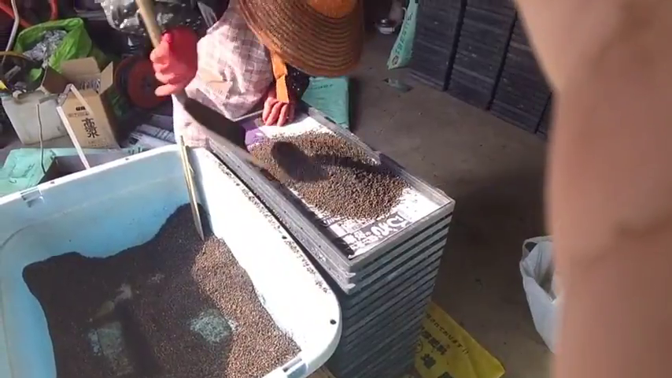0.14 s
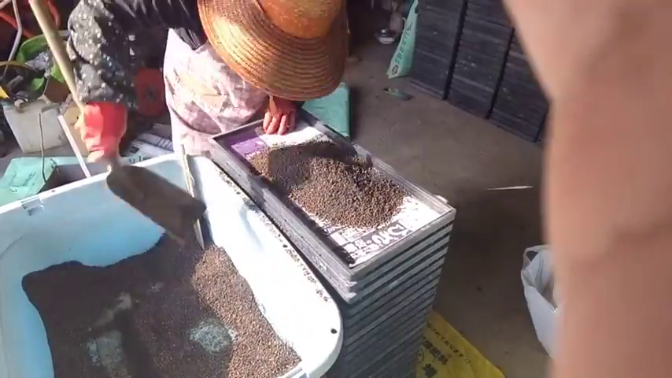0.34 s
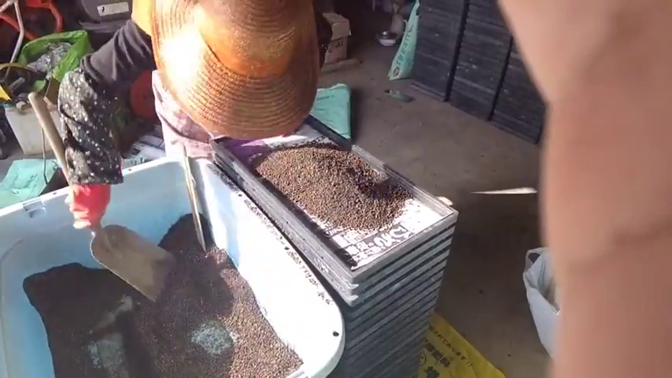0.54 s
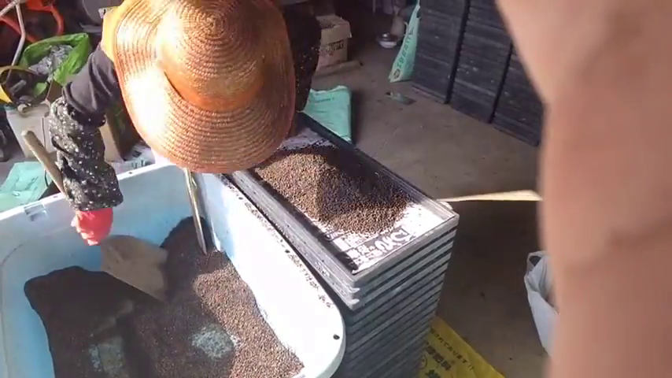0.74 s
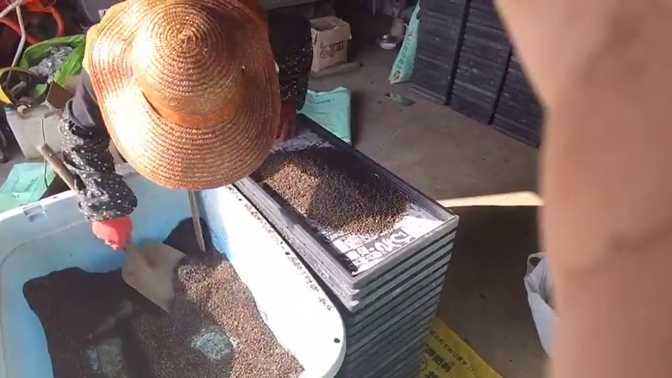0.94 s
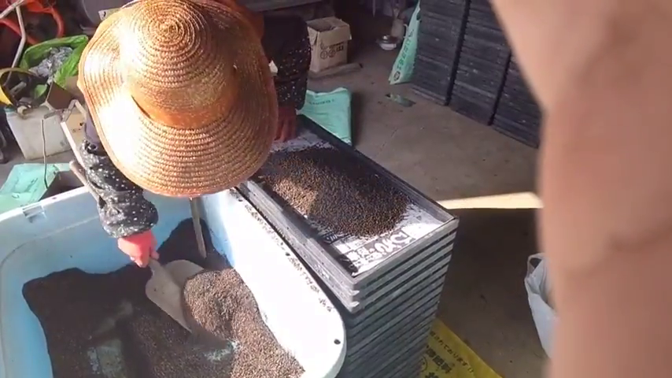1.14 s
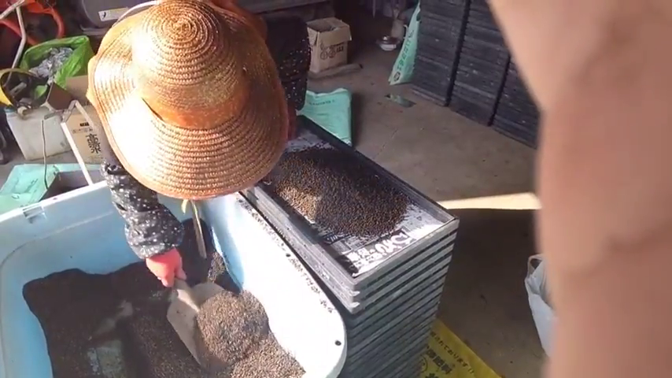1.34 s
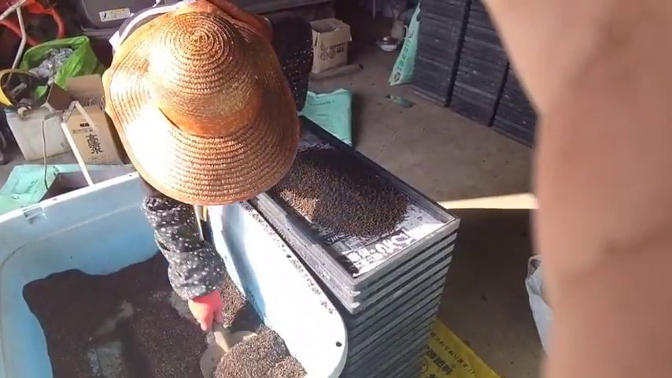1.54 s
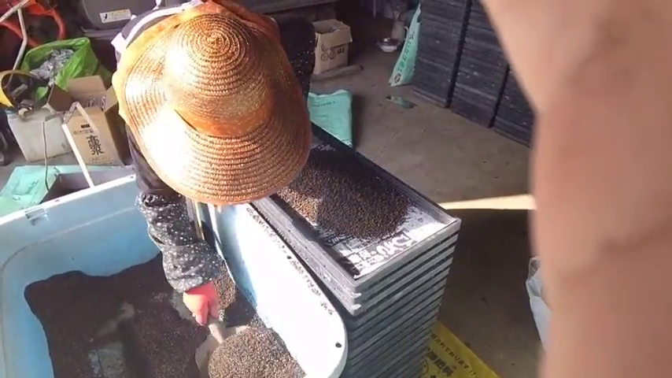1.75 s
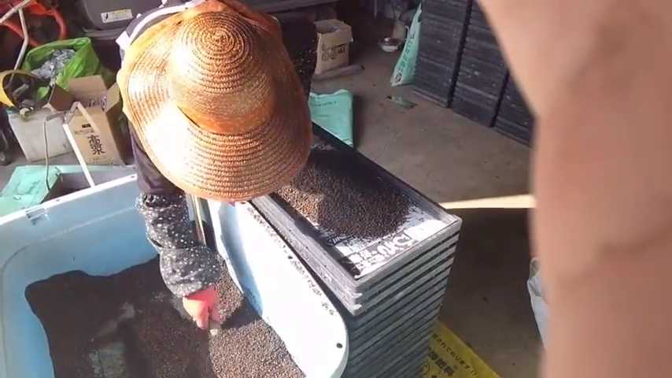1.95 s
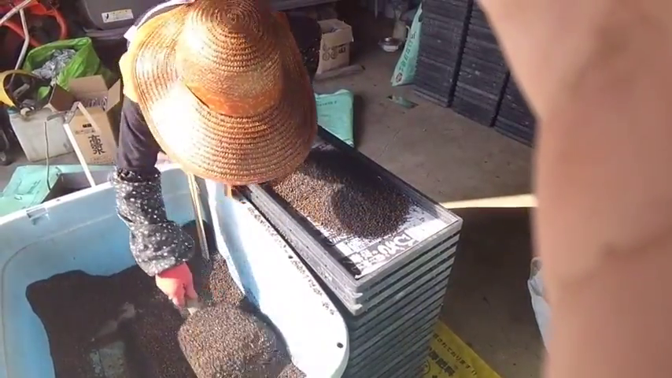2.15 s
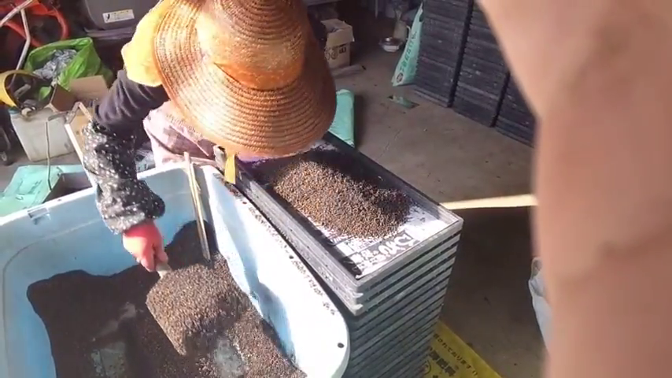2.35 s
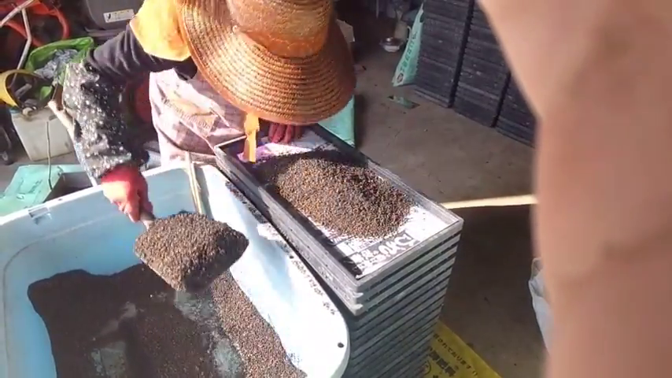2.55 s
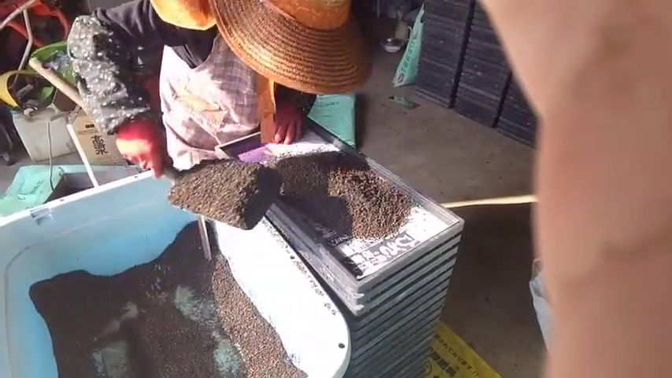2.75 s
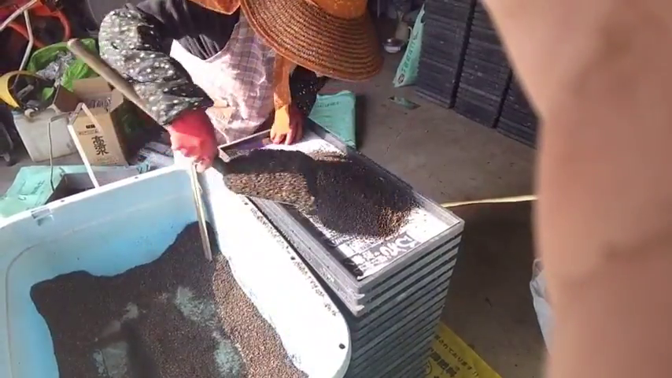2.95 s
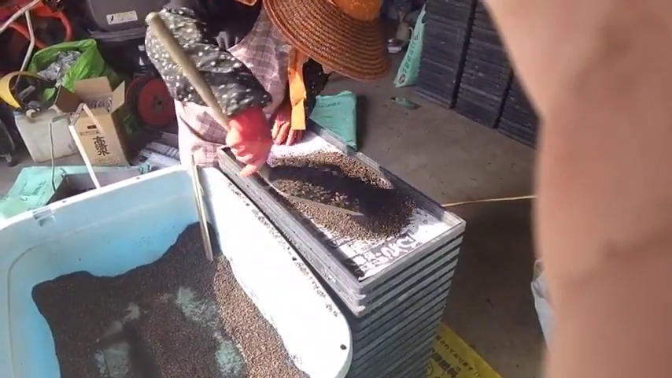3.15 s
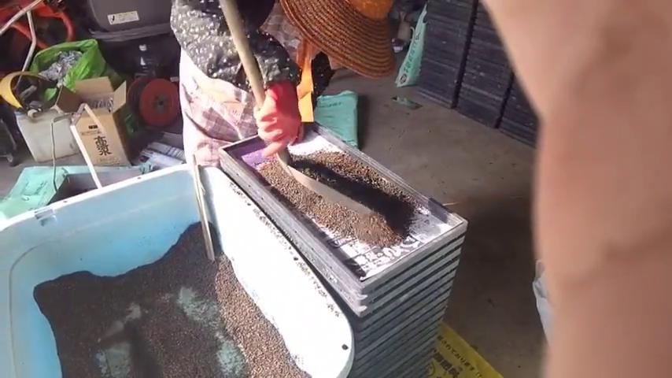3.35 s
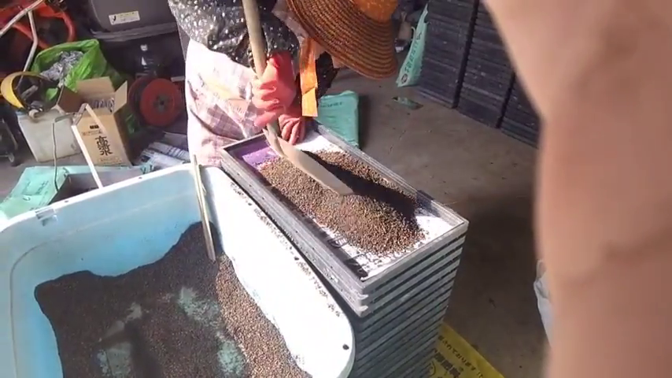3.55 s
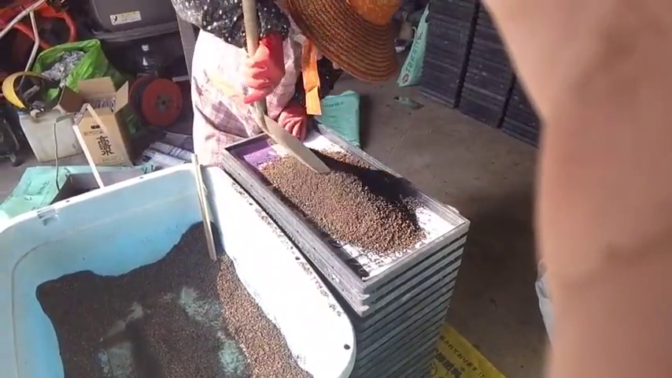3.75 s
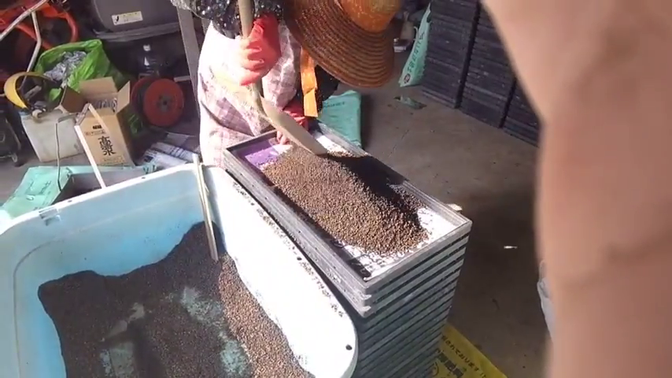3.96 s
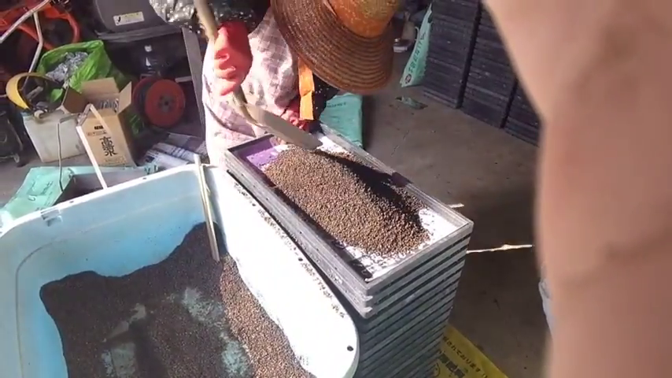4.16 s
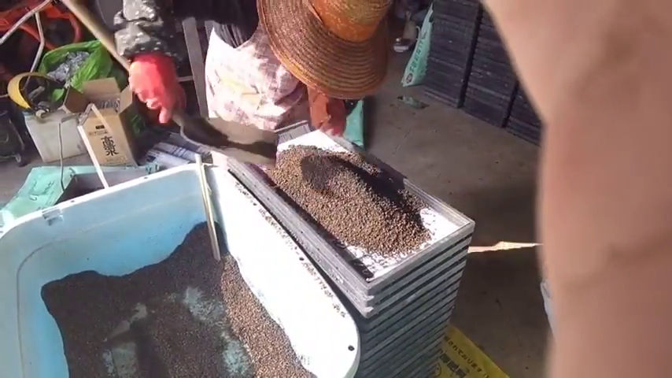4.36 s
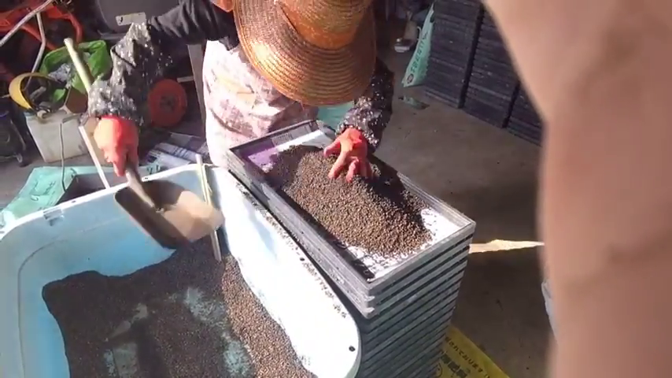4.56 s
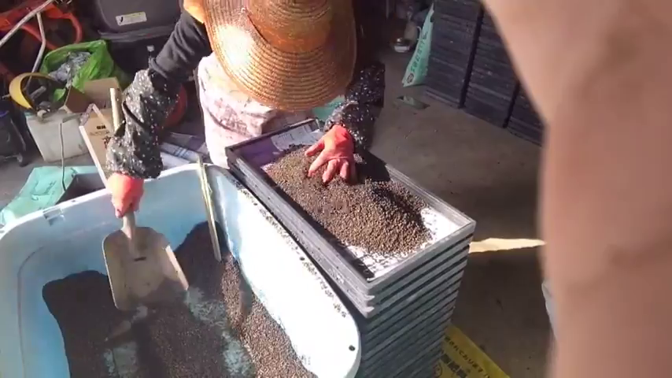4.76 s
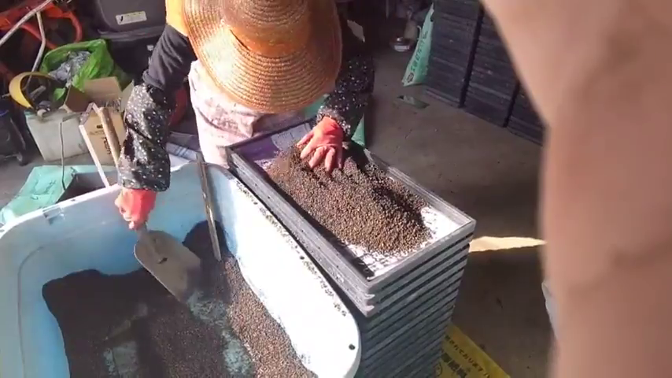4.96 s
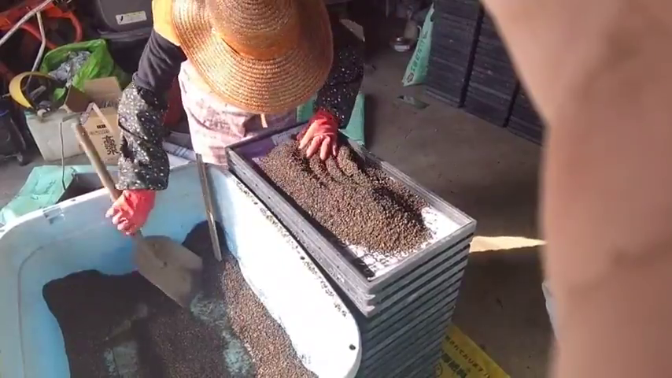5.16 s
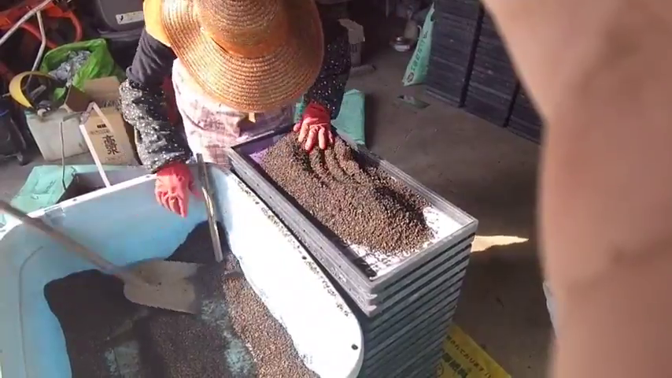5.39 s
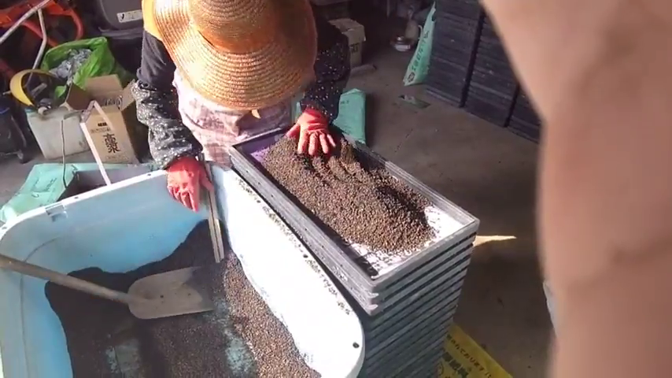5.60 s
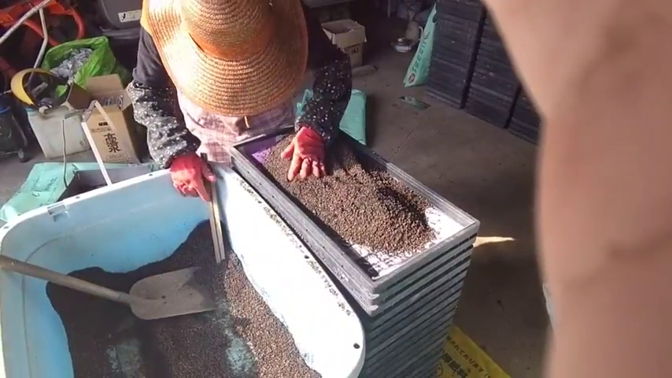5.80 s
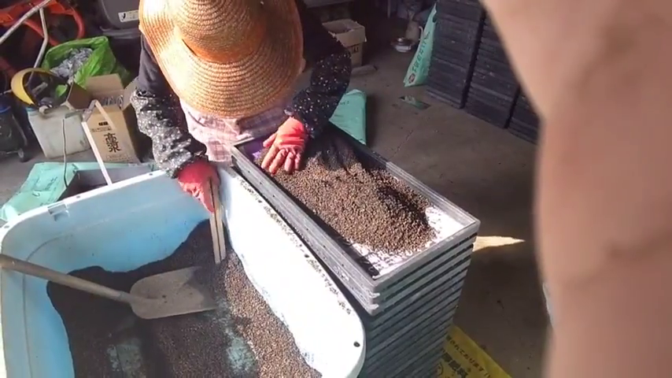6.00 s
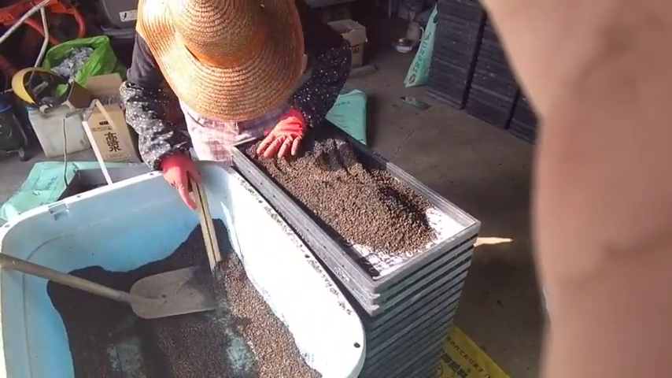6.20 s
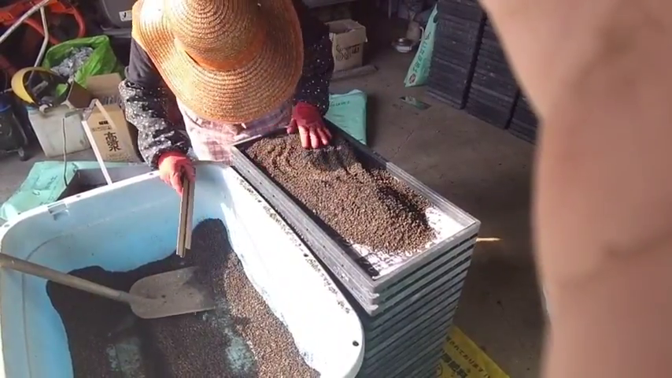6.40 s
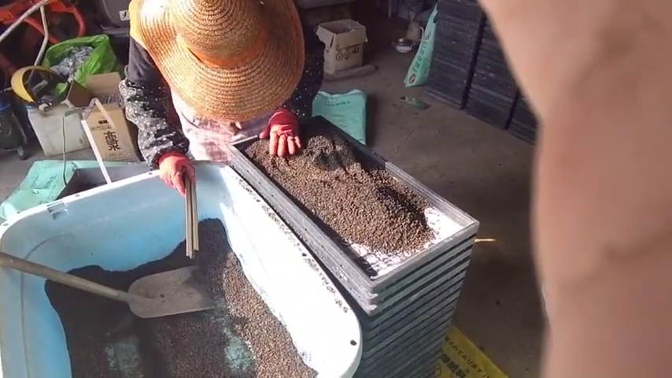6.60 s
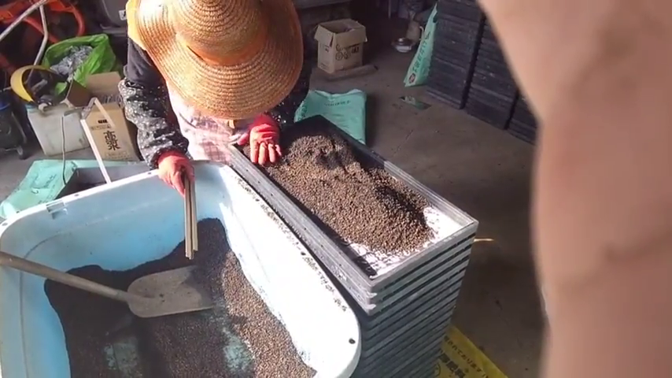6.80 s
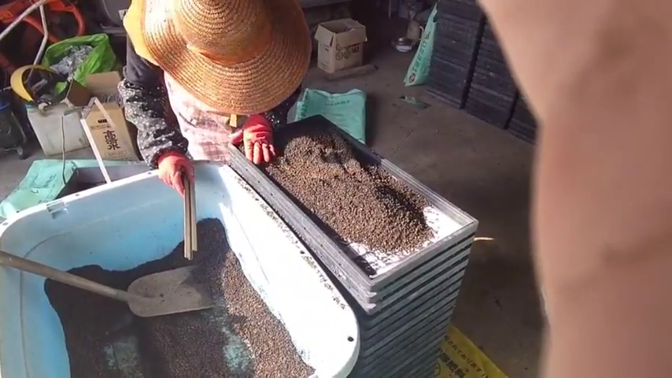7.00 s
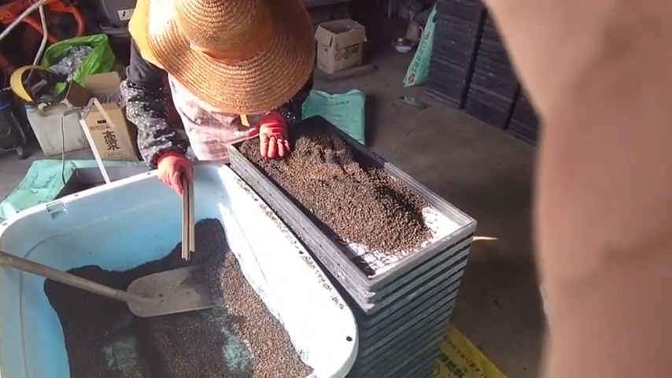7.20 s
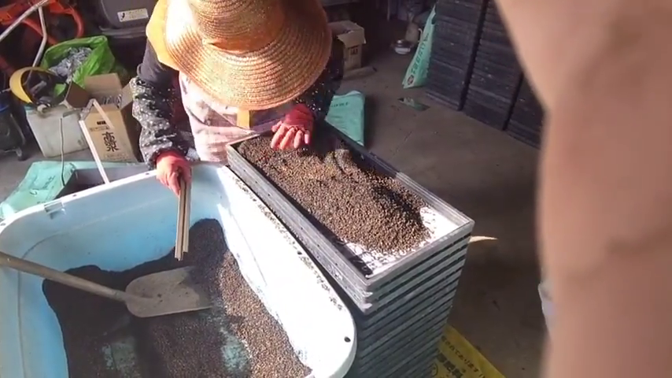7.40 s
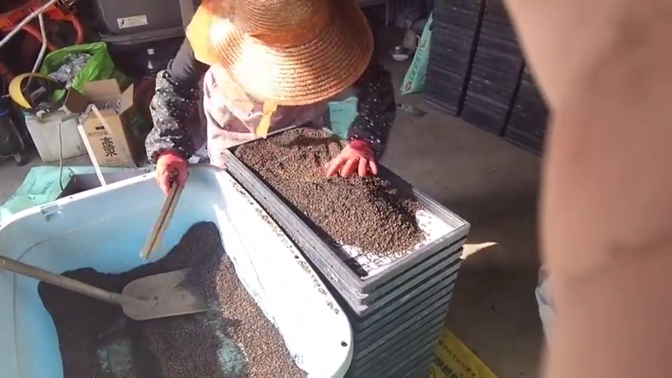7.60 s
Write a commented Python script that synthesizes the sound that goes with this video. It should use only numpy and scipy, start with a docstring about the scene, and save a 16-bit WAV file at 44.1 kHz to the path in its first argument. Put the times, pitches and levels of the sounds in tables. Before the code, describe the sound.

A shovel crunches and rasps through pelleted soil along a hollow plastic tub, soil slides out, the shovel clatters down, a glove rustles.

```python
"""Shovelling pelleted soil

A shovel crunches into pelleted soil, then rasps and bumps along a booming plastic tub floor.
Soil is tipped on a tray; the shovel drops into the tub with a clatter, then a glove spreads the soil.
Random contacts are filtered into crunch, rasp, fizz and rustle; tub and blade are sums of decaying modes.
Short noise bursts make clacks and ticks; a faint hush and a diffuse shed tail surround them, in stereo."""
import sys
import numpy as np
from scipy import signal
from scipy.fft import rfft, irfft, next_fast_len
from scipy.io import wavfile
from scipy.ndimage import uniform_filter1d

SR = 44100
rng = np.random.default_rng(int(sys.argv[2]) if len(sys.argv) > 2 else 0)


def output_pcm(signal):
    """Save a mono or channel-first signal as 16-bit PCM at the path in sys.argv[1].

    Samples are clipped to [-1, 1] before scaling.
    """
    pcm = np.clip(np.atleast_2d(signal).T, -1, 1) * 32767
    wavfile.write(sys.argv[1], SR, np.round(pcm).astype(np.int16))


N = 336924
TIME_S = np.arange(N) / SR
BINS_HZ = np.fft.rfftfreq(4096, 1 / SR)

# tub modes: (frequency [Hz], relative level [dB], t60 [s])
TUB_MODES = [(65.3, -29, 0.11), (115.6, -17.5, 0.2), (166.8, -5.5, 0.12), (186.8, -1, 0.11),
             (228.7, 0, 0.086), (282.2, 5.5, 0.12), (282.4, 7, 0.12), (346.3, -1.5, 0.074),
             (417, -10, 0.072), (489, -18, 0.18)]
# shovel blade modes: (frequency [Hz], relative level [dB], t60 [s])
BLADE_MODES = [(573, 12.5, 0.12), (686, -9.5, 0.075), (818, -4.5, 0.17), (855, 9.5, 0.14),
               (960, -11.5, 0.55), (1060, -9.5, 0.56), (1132, -12.5, 0.14), (1290, 14, 0.097),
               (1700, -15, 0.18), (1780, -19.5, 0.06), (2170, -10, 0.053), (2227, 3, 0.12),
               (2720, -4, 0.17)]
# body of a blow on plastic: (frequency [Hz], relative level [dB per Hz])
CLACK_SPECTRUM = [(40, -28.5), (150, -16.5), (350, -15), (470, -10), (620, -6), (800, -0.5), (1100, -8.5),
                  (1500, -10), (2250, -11.5), (2800, -21), (3600, -32), (7000, -53)]
# bright edge of a hard contact: (frequency [Hz], relative level [dB per Hz])
EDGE_SPECTRUM = [(1500, -32), (2800, -4), (4500, 5), (6500, 1), (10000, -7.5), (11000, -8), (14500, -8.5)]


def amp(db):
    """Decibels to gain."""
    return 10 ** (np.asarray(db) / 20)


def unit(x):
    """Scales to an rms of one."""
    return x / np.sqrt(np.mean(x ** 2) + 1e-20)


def read(points, hz):
    """Interpolates a table's value on a log-frequency axis."""
    f, value = np.transpose(points)
    return np.interp(np.log(hz + 1), np.log(f + 1), value)


def add(mix, start_s, sound):
    """Mixes a stereo sound in at its start time."""
    part = mix[:, max(round(start_s * SR), 0):][:, :sound.shape[1]]
    part += sound[:, :part.shape[1]]


def convolve(x, response):
    """Filters along time and keeps the length."""
    return signal.oaconvolve(np.atleast_2d(x), np.atleast_2d(response), axes=1)[:, :x.shape[-1]]


def panned(x, lean_db):
    """Leans a sound to the left (positive) or right by a level difference."""
    return x * amp(np.array([[lean_db], [-lean_db]]) / 2)


def together(gains):
    """Overlapping movements add in power."""
    return np.sqrt(sum(g ** 2 for g in gains))


def colour(spectrum):
    """Minimum-phase impulse response with this spectrum."""
    log_gain = np.log(amp(np.maximum(read(spectrum, BINS_HZ), -90)))
    circle = np.concatenate([log_gain, log_gain[-2:0:-1]])
    response = np.fft.ifft(np.exp(np.conj(signal.hilbert(circle)))).real
    return response[:len(BINS_HZ)]


def ring(modes, size=16000):
    """An object's answer to one push, peak one: decaying sines of alternating sign."""
    t = np.arange(size) / SR
    x = np.zeros(size)
    for k, (hz, db, t60_s) in enumerate(modes):
        decay = amp(db - 60 * t / t60_s)
        x += (-1) ** k * decay * np.sin(2 * np.pi * hz * t)
    return x / abs(x).max()


def burst(t60_s, size=6000):
    """A contact and its scatter off nearby surfaces: dying noise of unit energy on each side."""
    decay = amp(-60 * np.arange(size) / SR / max(t60_s, 1e-3))
    x = rng.standard_normal((2, size)) * decay
    return x / np.linalg.norm(x, axis=1, keepdims=True)


def blow(response, t60_s, size=440):
    """A short contact through a response, rms one over its loudest hundredth of a second."""
    x = signal.fftconvolve(burst(t60_s), response[None], axes=1)
    return x / np.sqrt(uniform_filter1d((x ** 2).mean(0), size).max())


def collisions(per_s, spread_db, clump_db, clump_hz, t60_s, count=10, order=3):
    """Random contacts of uneven size in small avalanches, each from a few neighbouring places."""
    avalanche = (TIME_S * clump_hz + .4 * np.sin(TIME_S * clump_hz)).astype(int)
    clumps = uniform_filter1d(np.clip(rng.standard_normal(N), -2, 2)[avalanche], 80)
    size_db = spread_db * np.minimum(rng.exponential(1, N), 4) + clump_db * clumps
    struck = rng.random(N) < per_s / SR
    hits = amp(size_db) * rng.choice([-1, 1], N) * struck
    first_place = rng.integers(0, count, N)[avalanche // order]
    place = (first_place + rng.integers(0, order, N)) % count
    # each place has its own stereo burst
    return sum(convolve(hits * (place == k), burst(t60_s, size=1000)) for k in range(count))


def air():
    """The steady hush of the shed: coloured noise, independent on the two sides."""
    # (frequency [Hz], relative level [dB per Hz])
    hush_spectrum = [(25, 0.5), (80, -10.5), (200, -1.5), (440, -1.5), (830, -5.5), (1300, -9.5),
                     (2100, -8), (3100, -12), (5500, -9.5), (9500, -17), (14000, -19.5)]
    return amp(-61) * unit(convolve(rng.standard_normal((2, N)), colour(hush_spectrum)))


def shed(x, gap_s=0.005):
    """A diffuse tail: noise that dies at a different rate in each band."""
    # (frequency [Hz], t60 [s])
    decay_times = [(100, 0.15), (400, 0.36), (1500, 0.21), (5000, 0.29), (14000, 0.17)]
    hz, t, z = signal.stft(rng.standard_normal((2, SR // 2)), SR, nperseg=256)
    tail = signal.istft(z * amp(-60 * t / read(decay_times, hz)[:, None]), SR)[1]
    # silent for one gap, then fades in over another
    tail *= np.clip(np.arange(tail.shape[1]) / SR / gap_s - 1, 0, 1)
    return convolve(x, tail / np.linalg.norm(tail[0]))


def strays():
    """Loose pellets drop at random moments: rows of (time [s], tick [dB], knock [dB])."""
    # showers: (start [s], end [s], rate [pellets/s], typical relative tick level [dB])
    showers = [(2.329, 3.02, 20, -40.5), (5.704, 7.5, 6, -49.5)]
    rows = []
    for start_s, end_s, per_s, typical_db in showers:
        chance = rng.random((60, 2))
        times_s = start_s + np.cumsum(2 * chance[:, 0]) / per_s
        levels_db = typical_db + 5 * (2 * chance[:, 1] - 1)  # within 5 dB either way
        rows += [(s, db, db - 23) for s, db in zip(times_s, levels_db) if s < end_s]
    return rows


def ticks():
    """Little strikes of pellets and blade edge, each with a short knock of plastic under it."""
    # single strikes of pellets and blade edge, hard and faint:
    # (time [s], relative tick level [dB], relative knock level [dB])
    strikes = [(0.7143, -28, -69), (0.9717, -25.5, -28), (1.0994, -17, -22.5), (1.5224, -6, -20),
               (1.933, -25, -52), (2.5082, -31, -40), (2.5406, -27.5, -40), (2.6115, -29.5, -43),
               (2.6419, -29.5, -37.5), (2.6813, -29.5, -39), (2.7252, -29.5, -35), (2.8594, -30, -54),
               (2.8735, -35, -59), (3.268, -41, -64), (3.3213, -38, -54), (3.5967, -31, -31.5),
               (4.7516, -36, -36), (5.0045, -24, -31), (5.9074, -48, -35), (5.9269, -24.5, -57),
               (6.3919, -37.5, -57), (6.4028, -33.5, -54), (6.5538, -43.5, -48), (6.9666, -31, -50)]
    out, clack, edge = np.zeros((2, N)), colour(CLACK_SPECTRUM), colour(EDGE_SPECTRUM)
    for s, tick_db, knock_db in strikes + strays():
        add(out, s, amp(tick_db - 10.5) * blow(edge, t60_s=0.016))
        add(out, s, amp(knock_db - 8) * blow(clack, t60_s=0.02))
    return out


def speed(start_s, rise_s, hold_s, fall_s):
    """Speed of moving soil, 0 to 1: it gathers pace, runs and slows to a stop."""
    t = TIME_S - start_s
    return np.clip(np.minimum(t / rise_s, 1 - (t - rise_s - hold_s) / fall_s), 0, 1)


def sliding_soil():
    """Pellets fizz on the blade or under the glove, while soil rustles on the tray or in the tub beneath."""
    # soil sliding off or under the blade: (start [s], rise [s], hold [s], fall [s],
    # relative fizz level [dB], relative rustle level [dB], lean of the fizz to the left [dB])
    slides = [(-0.07, 0.19, 0.027, .58, -45, -48, 0.5), (2.003, 0.31, 0.025, 0.11, -59, -53, -3),
              (2.282, 0.22, .24, .36, -51, -49, 0), (3.275, 0.21, 0.025, 0.29, -34, -43.5, -3),
              (3.143, .6, .5, .22, -48.5, -50.5, -1), (3.884, 0.056, 0.044, 0.24, -45, -45.5, -2),
              (4.27, 0.4, 0.19, 0.098, -57.5, -56, 3), (4.798, 0.34, .1, 0.23, -40, -49.5, -3)]
    # glove over the tray: (start [s], rise [s], hold [s], fall [s],
    # relative fizz level [dB], relative rustle level [dB])
    sweeps = [(5.625, 0.18, 0.14, .1, -54.5, -50.5), (5.902, 0.1, .22, 0.18, -38.5, -47.5),
              (6.36, 0.038, 0.028, 0.12, -59.5, -55), (6.495, 0.093, 0.48, 0.66, -58.5, -55),
              (6.665, .07, 0.058, 0.27, -50, -76), (7.507, 0.11, 0.073, .1, -73, -63.5)]
    # spectra of blade fizz, glove fizz and rustle: (frequency [Hz], relative level [dB per Hz])
    fizz_spectrum = [(1500, -35), (2500, -8), (3200, -11.5), (4300, -2.5), (5200, -2), (6700, -1),
                     (8700, -5), (9800, -4.5), (10900, -12.5), (12000, -11), (13800, -10.5), (14800, -37)]
    rub_spectrum = [(1500, -48.5), (2500, -13), (3200, -7.5), (4400, -1), (5300, 0.5), (7000, -2),
                    (9800, -3), (10900, -8.5), (12200, -4), (14000, -10), (14800, -17)]
    rustle_spectrum = [(60, -73.5), (140, -16.5), (230, -5), (300, -1), (450, -2), (700, -2.5), (1000, -3),
                       (1400, -4.5), (2100, 0), (2850, -9.5), (4300, -27.5)]
    fizz_power, rustle_power = 1.48, 0.98  # gain grows as these powers of speed

    pellets = collisions(per_s=5900, spread_db=1.0, clump_db=1.0, clump_hz=110.5, t60_s=0.0073, count=16)
    fizz = unit(convolve(pellets, colour(fizz_spectrum)))
    rub = unit(convolve(pellets, colour(rub_spectrum)))
    grains = collisions(per_s=3000, spread_db=3.5, clump_db=0.86, clump_hz=69.64, t60_s=0.021)
    rustle = unit(convolve(grains, colour(rustle_spectrum)))

    blade = together(panned(amp(db) * speed(*timing) ** fizz_power, lean_db)
                     for *timing, db, _, lean_db in slides)
    glove = together(amp(db) * speed(*timing) ** fizz_power for *timing, db, _ in sweeps)
    beneath = together(amp(row[5]) * speed(*row[:4]) ** rustle_power for row in slides + sweeps)
    bright = fizz * blade + panned(rub * glove, lean_db=0.3)
    return amp(-1.0) * bright + amp(-1.5) * rustle * beneath


def knocks():
    """Blows clack and thump the tub; a bare blade is brighter and rings louder than a buried one."""
    # shovel on tub and trays: (time [s], relative clack level [dB], relative thump level [dB],
    # bareness of the blade [0 buried, 1 free])
    blows = [(0.236, -31.5, -67, 0), (0.838, -39, -30, 0.58), (1.055, -30.5, -27, 0.11),
             (1.091, -26.5, -30, 1), (1.163, -31, -25, 0.58), (1.253, -4, -15.5, 0.24),
             (1.487, -14, -23.5, 0.72), (1.584, -18.5, -17.5, 1), (1.622, -18, -22, .8),
             (4.912, -52, -43.5, .7), (5.012, -29, -23, 1), (5.032, -27.5, -28, 1), (5.243, -36, -30, 1),
             (5.268, -20, -27, 0.98), (5.449, -21.5, -29, 0.79), (5.46, -7, -13.5, .8),
             (5.497, -1.5, -14, 0.79), (5.563, -9, -36, 0.93), (5.975, -26, -64, 0.23),
             (6.002, -25.5, -44, 0.4), (6.744, -58, -54, 0.69), (7.568, -57, -56, .5)]
    out, clack, edge = np.zeros((2, N)), colour(CLACK_SPECTRUM), colour(EDGE_SPECTRUM)
    thump, blade = np.tile(ring(TUB_MODES), (2, 1)), np.tile(ring(BLADE_MODES), (2, 1))
    for s, clack_db, thump_db, bare in blows:
        # each pair: (buried, free)
        edge_db = np.interp(bare, (0, 1), (-39, -17.5))
        ring_db = np.interp(bare, (0, 1), (-19.5, -13))
        clack_t60_s = np.interp(bare, (0, 1), (0.016, 0.055))
        add(out, s, amp(clack_db - 7) * blow(clack, clack_t60_s))
        add(out, s, amp(clack_db + ring_db) * blade)
        add(out, s, amp(thump_db - 0.5) * thump)
        add(out, s, amp(clack_db + edge_db) * blow(edge, clack_t60_s))
    return out


def push(start_s, length_s, swell_db, stop_db_per_s):
    """Gain of one push: the blade bites quickly, pressure changes evenly, then pellets come to rest."""
    attack_s = 0.011
    t = TIME_S - start_s
    swell = swell_db * (np.clip(t / length_s, 0, 1) - .5)
    stop = stop_db_per_s * np.maximum(t - length_s, 0)
    return np.clip(t / attack_s, 0, 1) * amp(np.maximum(swell - stop, -150))


def judder():
    """Gain of the blade's uneven stick and slip: random levels joined by lines."""
    steps_per_s, depth_db = 36, 1.8
    steps = rng.uniform(-1, 1, 1000)
    return amp(depth_db * np.interp(steps_per_s * TIME_S, np.arange(len(steps)), steps))


def shovelling():
    """The blade crushes pellets and slips over the tub floor; slips ring the blade and boom in the tub."""
    # first the loaded shove, later the empty blade sliding and skidding to rest:
    # (start [s], length [s], swell from start to end [dB],
    # relative crunch level [dB], relative rasp level [dB], relative boom level [dB])
    pushes = [(0.708, 0.078, -1, -45, -52.5, -56), (0.789, 0.18, 8, -46, -40.5, -36.5),
              (1.006, 0.27, 5.5, -41, -37.5, -37.5), (1.315, .15, 0, -34.5, -30, -39),
              (1.467, 0.16, 2, -31, -23, -32), (1.656, 0.23, 4, -50, -44.5, -55),
              (1.77, 0.059, 4.5, -42.5, -32.5, -41.5), (1.907, 0.073, -1, -44, -39, -43.5),
              (4.74, 0.2, -3, -46.5, -51.5, -59), (4.982, .31, 1, -39.5, -45, -52.5),
              (5.24, 0.19, -3.5, -42, -41, -31), (5.505, 0.091, -15, -47.5, -30.5, -26.5),
              (5.611, 0.012, -3, -33, -32, -30.5)]
    # spectra of crushed pellets and slipping blade: (frequency [Hz], relative level [dB per Hz])
    crunch_spectrum = [(1590, -36), (2700, -10), (3810, -5), (4370, -1.5), (5570, 0), (6620, -4),
                       (9820, -6), (10700, -14), (12600, -7), (14200, -15.5), (15000, -29.5)]
    rasp_spectrum = [(240, -35.5), (400, -5), (456, -8), (497, -14.5), (692, 0.5), (868, -4.5), (1030, -3),
                     (1240, -11), (1450, -1.5), (1820, -8.5), (2220, -4.5), (2490, -12.5), (3200, -15.5),
                     (4160, -40.5), (7040, -120)]

    pellets = collisions(per_s=4500, spread_db=3.1, clump_db=1.5, clump_hz=120, t60_s=.005, count=16)
    crunch = unit(convolve(pellets, colour(crunch_spectrum)))
    slips = collisions(per_s=1500, spread_db=1.5, clump_db=2.0, clump_hz=70.26, t60_s=0.0082)
    scrape = unit(convolve(slips, colour(rasp_spectrum)))
    ringing = unit(convolve(slips, ring(BLADE_MODES)))
    rasp = unit(scrape + amp(-10.5) * ringing)
    bumps = collisions(per_s=700, spread_db=0.5, clump_db=1.0, clump_hz=39.6, t60_s=0.0033)
    boom = unit(convolve(bumps, ring(TUB_MODES)))

    crushing = together(amp(db) * push(*shape, stop_db_per_s=260.5) for *shape, db, _, _ in pushes)
    slipping = together(amp(db) * push(*shape, stop_db_per_s=219) for *shape, _, db, _ in pushes)
    pressing = together(amp(db) * push(*shape, stop_db_per_s=240) for *shape, _, _, db in pushes)
    mix = amp(-0.17) * crunch * crushing + amp(-0.63) * rasp * slipping + amp(-1.5) * boom * pressing
    return judder() * mix


def scene():
    """All sources in the shed, whose walls throw back a short tail."""
    hush = air()
    sources = ticks() + sliding_soil() + knocks() + shovelling()
    return sources + shed(amp(-9) * sources) + hush


def record(dry, lag_s=.00005):
    """Two close ports share the bass, differ in the treble, right leading; then overload and band limit."""
    # likeness of the two sides: (frequency [Hz], likeness [-1 to 1])
    likeness = [(100, .985), (350, .98), (700, .93), (1200, .62), (2000, .1), (4000, .1), (14000, .12)]
    # level balance of the ports: (frequency [Hz], left minus right [dB])
    balance = [(200, -1.9), (800, -2.5), (1900, 2), (3500, -0.5), (6500, -4), (8500, -4.5), (9900, -8),
               (10800, 0.5), (13000, -3)]
    size = next_fast_len(N + len(BINS_HZ))
    hz = np.fft.rfftfreq(size, 1 / SR)
    a, b = rfft(dry, size)
    alike = np.clip(read(likeness, hz), -1, 1)
    mid = (a + b) * np.sqrt(1 + alike) / 2
    side = (a - b) * np.sqrt(1 - alike) / 2
    lean = amp(read(balance, hz) / 2)
    left = (mid + side) * lean * np.exp(-2j * np.pi * hz * lag_s)
    right = (mid - side) / lean
    ports = irfft(np.array([left, right]), size)[:, :N]
    rounded = ports / (1 + (ports / .95) ** 8) ** (1 / 8)  # peaks bend towards 0.95
    low_pass = signal.firwin(501, 14350, window=("kaiser", 8), fs=SR)  # cutoff in Hz
    return signal.oaconvolve(rounded, low_pass[None], "same", axes=1)


dry = scene()
out = record(dry)
output_pcm(out)
```